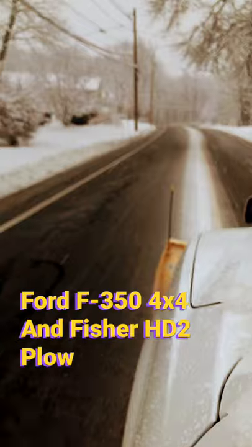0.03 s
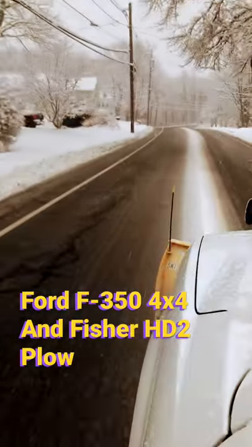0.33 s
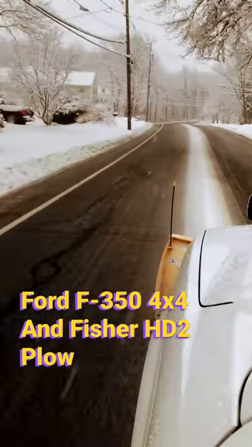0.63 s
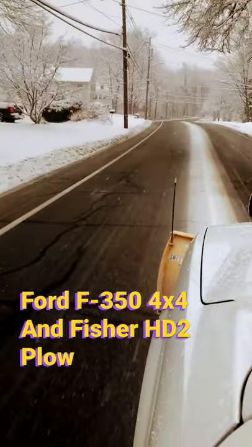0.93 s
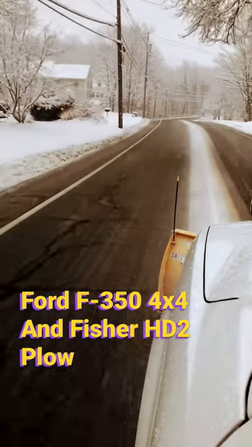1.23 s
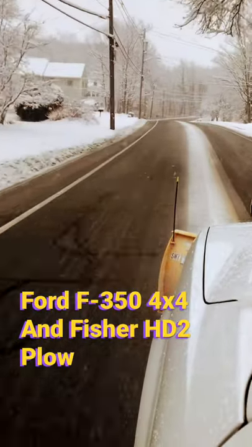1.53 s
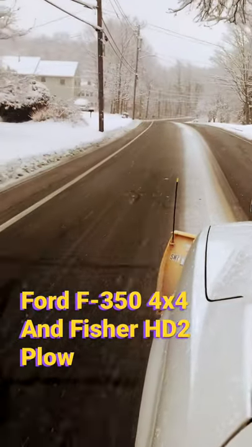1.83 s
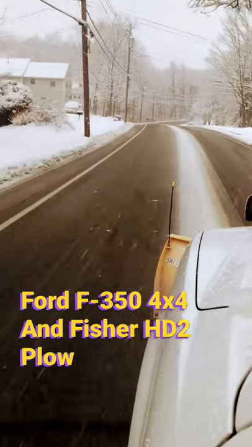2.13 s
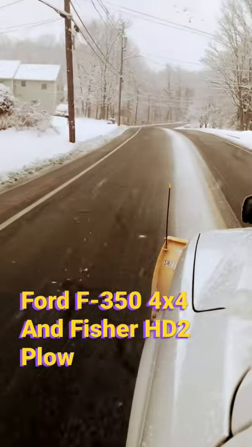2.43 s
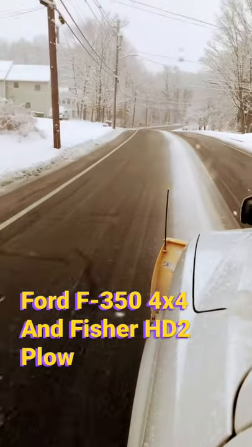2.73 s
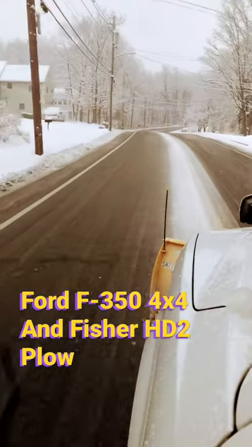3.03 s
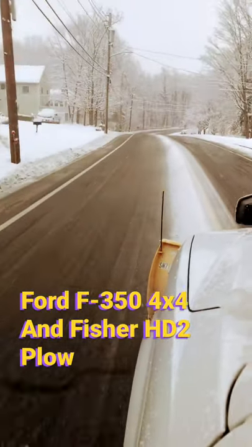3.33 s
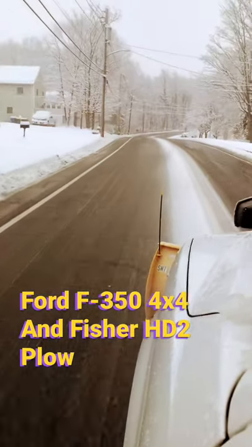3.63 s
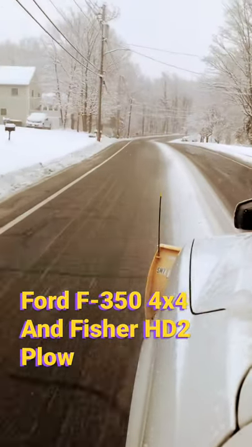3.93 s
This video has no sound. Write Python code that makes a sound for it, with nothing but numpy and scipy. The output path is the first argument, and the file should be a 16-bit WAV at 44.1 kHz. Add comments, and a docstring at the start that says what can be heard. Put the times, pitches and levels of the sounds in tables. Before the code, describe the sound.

A raised snow plow clunks on a driving pickup truck, with short, ringing metal knocks clustered in the first 0.8 seconds. After a lull, they return irregularly from about 1.9 seconds until 4. Tyre rumble, engine hum and a hollow cab boom continue underneath, while air and wet spray hiss past the open window. Gusts buffet the microphone, mostly between 2 and 3 seconds, and a few slush drops tick faintly.

```python
"""A raised snow plow clunks in its mount as a pickup truck drives over cracked, wet winter asphalt.
Each clunk is a burst of tiny metal hits that make the plow ring. Heard at the open side window,
the tyres and engine rumble, the cab booms, and air and spray hiss along the body.
Gusts buffet the microphone, and a few drops of slush tick against the truck."""
import sys
import numpy as np
from scipy import signal
from scipy.fft import rfft, irfft
from scipy.io import wavfile
from scipy.ndimage import uniform_filter1d

SR = 44100
rng = np.random.default_rng(int(sys.argv[2]) if len(sys.argv) > 2 else 0)


def waveform_to_disk(signal):
    """Save audio, clipped to [-1, 1], as 16-bit WAV at the path in sys.argv[1]."""
    frames = np.transpose(np.atleast_2d(signal))
    scaled = np.clip(frames, -1, 1) * 32767
    samples = np.round(scaled).astype(np.int16)
    wavfile.write(sys.argv[1], SR, samples)


N = 176400
T = np.arange(N) / SR


def from_db(db):
    """Turn decibels into a factor to multiply by."""
    return 10 ** (np.asarray(db) / 20)


def rms_one(x):
    """Scale a signal so that its average strength (rms) is 1."""
    return x / np.sqrt(np.mean(x ** 2) + 1e-20)


def level(rows):
    """A volume curve through (time [s], level [dB]) points."""
    return from_db(np.interp(T, *np.transpose(rows)))


def drift(hz):
    """A smooth random wobble of size about 1; more hz makes it quicker."""
    r = np.exp(-80 * np.pi * hz / SR)
    slow = signal.lfilter([1], [1, -2 * r, r * r], rng.standard_normal(N // 40 + 2002))[2000:]
    return np.interp(np.arange(N) / 40, np.arange(len(slow)), rms_one(slow))


def ring(x, hz, ring_s):
    """Let x set off one ringing note, which fades by 60 dB in ring_s."""
    r, w = from_db(-60 / (ring_s * SR)), 2 * np.pi * hz / SR
    return signal.lfilter([0, np.sin(w)], [1, -2 * r * np.cos(w), r * r], x + 1e-18)


def colour(x, spectrum):
    """Shape bass and treble by (frequency [Hz], level [dB]) points; strength 1."""
    hz, db = np.transpose(spectrum)
    f = np.log(np.maximum(np.arange(N // 2 + 1) * SR / N, 1))
    outside = np.maximum(np.log(hz[0]) - f, 0) + np.maximum(f - np.log(hz[-1]), 0)
    gain = from_db(np.interp(f, np.log(hz), db) - 20 * outside)
    return rms_one(irfft(rfft(x) * gain, N))


def noise(spectrum):
    """Noise with the given tone colour."""
    return colour(rng.standard_normal(N), spectrum)


def evened(x, span_s):
    """Even out swells in a noise that last longer than span_s."""
    return x / np.sqrt(uniform_filter1d(x * x, max(int(span_s * SR), 2)) + 1e-9)


def clicks(per_s, spread_db):
    """Tiny hits at random times, of uneven strength."""
    hits = (rng.random(N) < per_s / SR) * rng.choice([-1, 1], N)
    return hits * from_db(spread_db * np.minimum(rng.exponential(1, N), 4))


def road_spray():
    """The wet road hisses and throws up fine grit; the tyres sizzle more for a while."""
    # tone colour of the spray and of the sizzle: (frequency [Hz], level [dB])
    spray_colour = [(1500,-29),(3000,-4),(4300,4.5),(5000,-3),(7000,2.5),(7600,-3.5),(9000,-0.5),(10000,-7),(10450,-18),(11200,-4),(16000,-29)]
    sizzle_colour = [(1500,-18),(2000,6),(2350,8),(2850,2.5),(3200,-4),(5800,-15),(8000,-31)]
    # the sizzle swells and fades: (time [s], level [dB])
    sizzle_level = [(.8,-55),(1.03,-42),(1.48,-32.5),(1.85,-54),(2.15,-65)]
    spray = from_db(-48.5 + 0.91 * drift(8.8)) * noise(spray_colour)
    sizzle = level(sizzle_level) * noise(sizzle_colour)
    grit = colour(clicks(per_s=87, spread_db=2.0), [(2500, -15), (6000, 7), (16000, 0)])
    return spray + sizzle + from_db(-61) * grit


def slush_drops():
    """Drops of slush tick on the truck, each a tiny burst of noise."""
    # the drops: (time [s], peak level [dB], pitch [Hz])
    drops = [(.6192,-30,7450),(1.5151,-29,6000),(1.690,-27,7000),(1.701,-32,12000),(1.946,-38,12000),(1.969,-27,7950),(2.795,-35,8000),(2.829,-27,5500),(2.995,-33,14000)]
    out, decay_s = np.zeros(N), .0014
    for s, db, hz in drops:
        fade = (T >= s) * np.exp(-np.minimum(np.abs(T - s) / decay_s, 20))
        band = signal.butter(1, [.75 * hz, min(1.3 * hz, .45 * SR)], "band", fs=SR, output="sos")
        tick = signal.sosfilt(band, rng.standard_normal(N) * fade)
        out += from_db(db) * tick / np.abs(tick).max()
    return out


def window_air():
    """Air hisses and flutters past the window."""
    # tone colour of the air: (frequency [Hz], level [dB])
    hiss_colour = [(700,-4),(1300,6.5),(1900,1),(2400,3),(2850,2.5),(3200,-2),(4200,-6),(4900,-10),(5500,-10.5),(7000,-17.5),(9000,-22),(10500,-24.5),(11500,-24.5),(16000,-23.5)]
    # its loudness: (time [s], level [dB])
    hiss_level = [(0,-31),(.2,-35.5),(.34,-38),(.48,-37),(.64,-33),(.85,-35),(1.02,-33),(1.3,-33),(1.48,-33),(1.8,-30.5),(2.05,-33.5),(2.6,-33),(3.08,-33),(3.2,-30.5),(3.45,-32.5),(3.7,-31.5),(4,-32)]
    flutter = from_db(1.23 * drift(36) + 0.52 * drift(130))
    return level(hiss_level) * noise(hiss_colour) * flutter


def engine():
    """The turning engine hums one low, slightly unsteady note."""
    # the hum: (waves per engine turn [count], level [dB])
    hum = [(3,-29.5)]
    out, turns_per_s = np.zeros(N), 24.67
    turns = np.cumsum(turns_per_s * (1 + 0.01187 * drift(3.2))) / SR
    for waves, db in hum:
        gain = from_db(db + 2.6 * drift(2.5))
        out += gain * np.sqrt(2) * np.sin(2 * np.pi * (waves * turns + rng.random()))
    return out


def cab_boom():
    """The cab booms with a deep, hollow noise."""
    # tone colour of the boom: (frequency [Hz], level [dB])
    boom_colour = [(120,-29),(165,-7),(198,1.5),(235,-3),(310,-9),(420,-27)]
    # its loudness: (time [s], level [dB])
    boom_level = [(0,-29),(.75,-24),(.95,-29.5),(1.25,-24),(1.7,-22),(2.1,-28),(3.0,-26),(4,-31.5)]
    return level(boom_level) * evened(noise(boom_colour), span_s=0.11)


def tyres():
    """The tyres rumble over the road, and their tread sings faintly."""
    # tone colour of the rumble: (frequency [Hz], level [dB])
    rumble_colour = [(22,-32),(30,-24),(40,-3.5),(68,-0.5),(105,-7),(150,-4.5),(195,-7.5),(260,-14),(330,-11),(420,-17),(560,-17),(700,-22),(950,-23),(1300,-28),(2000,-36.5),(4000,-66)]
    # its loudness: (time [s], level [dB])
    rumble_level = [(0,-16.5),(.7,-20.5),(.87,-21),(1.15,-19.5),(1.6,-18),(2.1,-18.5),(2.7,-16),(3.03,-20),(3.4,-17),(4,-17.5)]
    # notes of the tread: (pitch [Hz], pitch spread [Hz], level [dB])
    tread_notes = [(578,75,-39),(766,63,-48),(964,31,-40.5)]
    out = level(rumble_level) * evened(noise(rumble_colour), span_s=0.043) * from_db(drift(36))
    for hz, spread, db in tread_notes:
        ring_s = np.log(1000) / np.pi / spread  # a purer note rings longer
        out += from_db(db) * rms_one(ring(rng.standard_normal(N), hz, ring_s))
    return out


def wind_gusts():
    """Each gust rolls a few uneven swirls of air over the microphone, with finer churning on top."""
    # the gusts: (time [s], relative level [dB], length [s], swirl rate [Hz])
    gusts = [(0.393,-5,0.024,75.1),(0.734,-15,0.032,70),(0.766,-12.5,0.037,200.9),(1.11,-15,0.049,191.3),(1.742,-16,0.057,55),(1.847,-6.5,0.058,70),(1.922,-13,0.033,75),(2.06,-2,0.044,72),(2.342,-6.5,0.035,80),(2.402,-10,0.082,58),(2.539,-9,0.03,159.8),(2.564,-6,0.073,58),
             (2.685,-10,0.02,70),(2.868,-7,0.051,72.92),(2.889,-7,0.052,62),(3.009,-13.5,0.038,81),(3.265,-7.5,0.049,74),(3.446,-13,0.048,150),(3.718,-14,0.047,63),(3.913,-15,0.092,135)]
    # tone colour of the churning air: (frequency [Hz], level [dB])
    churn_colour = [(28,-22),(50,-10),(90,-2),(140,0),(260,-2.5),(500,-19.5),(1500,-35)]
    out, edge_s = np.zeros(N), 0.0092
    churn = from_db(-7) * evened(noise(churn_colour), span_s=0.073)
    wander = np.exp(.22 * drift(48.6))
    for s, db, length, hz in gusts:
        rise = np.clip((T - s) / edge_s, 0, 1)
        fall = np.clip((s + length - T) / (2 * edge_s) + 0.25, 0, 1)
        swirls = np.sqrt(2) * np.sin(2 * np.pi * (np.cumsum(hz * wander) / SR + rng.random()))
        out += from_db(db - 2.5) * rise * fall * (swirls + churn)
    return out


def plow_clunks():
    """Each clunk is a fading chatter of hits that rings the frame, over one hollow note of the blade."""
    # the clunks: (time [s], relative level [dB], decay [s], blade pitch [Hz],
    # blade weight [dB], clatter weight [dB])
    clunks = [(.144,-24.5,0.011,452,2,-18),(0.207,-6.5,0.011,479,1.5,-28),(.273,-11,0.031,448,-1.5,-26),(0.393,-16,0.049,438,-7,-27),(.442,-27,.016,557,2,-20),(0.509,-22,0.011,413,-7,-26),(0.543,-13,0.024,378.5,-4.5,-27),(.603,-14,0.022,500,-16,-31),
              (0.696,-14,0.019,390,-21,-26),(0.749,-15.5,0.037,558,-2,-33),(.818,-15,0.025,572,-18,-28),(1.94,-16.5,0.023,392,-1,-26),(2.057,-16.5,0.012,395,-1,-41),(2.116,-25,0.014,467,3,-38),(2.22,-15.5,0.038,373,-6,-40),
              (2.325,-14.5,0.03,525,-12,-38),(2.427,-28,0.0079,500,4,-30),(2.551,-11.5,0.013,355,1.5,-39),(2.636,-15,0.014,376,-3,-28),(2.736,-13,0.0087,377,3.5,-43),(2.87,-16,0.046,475,-19,-36),(2.911,-24,0.021,398,-6,-36),
              (3.015,-16.5,0.005,405,1,-37),(3.120,-18.5,0.028,483,-1,-33),(3.157,-16,0.015,350,-9,-30),(3.251,-17.5,0.011,505,0,-27),(3.346,-27,0.01,387,10,-34),(3.480,-13,0.014,528,-3.5,-41),(3.911,-12,0.01,667,-6.5,-20.5)]
    # clear notes of the frame: (pitch [Hz], relative level [dB], ring time [s])
    frame_notes = [(359,-5,0.027),(407.4,12.5,0.043),(544,1.5,0.18),(639,-7.5,0.12),(796.5,1,0.11),(930,-2,0.14),(1093,-1.5,0.085),(1287,-4.5,0.072),(1425,-3,0.2),(1632,-10.5,0.077),(1770,-21.5,0.075)]
    # tone colour of the frame's dense ringing and of metal on metal: (frequency [Hz], level [dB])
    frame_colour = [(100,-13),(200,-8.5),(400,8.5),(600,8),(900,0),(1450,-5),(2000,-17),(3500,-27),(6000,-37)]
    clatter_colour = [(1500,3),(3000,-11),(5000,-6),(7500,-6),(10000,-22),(16000,-34)]
    out, rise_s = np.zeros(N), 0.0067
    frame = from_db(-4.5) * evened(noise(frame_colour), span_s=0.016)
    clatter = noise(clatter_colour)
    hits_per_note = [clicks(per_s=1500, spread_db=1.0) for _ in frame_notes]
    for s, db, decay, blade_hz, blade_db, clatter_db in clunks:
        part = slice(int(s * SR), int(s * SR) + SR // 4)
        t = T[part] - T[part][0]
        # the force rises, holds briefly, then dies away
        force = np.minimum(t / rise_s, 1) * np.exp(-np.maximum(t - 2 * rise_s, 0) / decay)
        notes = sum(from_db(note_db) * rms_one(ring(hits[part] * force ** 3, hz, ring_s))
                    for hits, (hz, note_db, ring_s) in zip(hits_per_note, frame_notes))
        notes = from_db(-5.5) * rms_one(notes) * np.sqrt(np.mean(force ** 2))
        blade = from_db(blade_db - 3.5) * np.sqrt(2) * np.sin(2 * np.pi * (blade_hz * t + rng.random()))
        knock = force * (blade + frame[part] + from_db(clatter_db) * clatter[part])
        out[part] += from_db(db) * (notes + knock)
    return out


def scene():
    """Add all the sounds into one channel."""
    background = road_spray() + slush_drops() + window_air() + engine() + cab_boom() + tyres()
    return (background + wind_gusts() + plow_clunks())[None]


def record(dry):
    """Start and stop the sound abruptly, round off its tallest peaks and cut the highest treble."""
    start_s, fade_s, cutoff_hz = .035, .004, 15800
    x = dry * np.clip(np.minimum(T - start_s, T[-1] - T) / fade_s, 0, 1)
    rounded = x / (1 + x ** 6) ** (1 / 6)
    return signal.sosfilt(signal.ellip(12, .1, 90, cutoff_hz, fs=SR, output="sos"), rounded)


dry = scene()
out = record(dry)
waveform_to_disk(out)
```